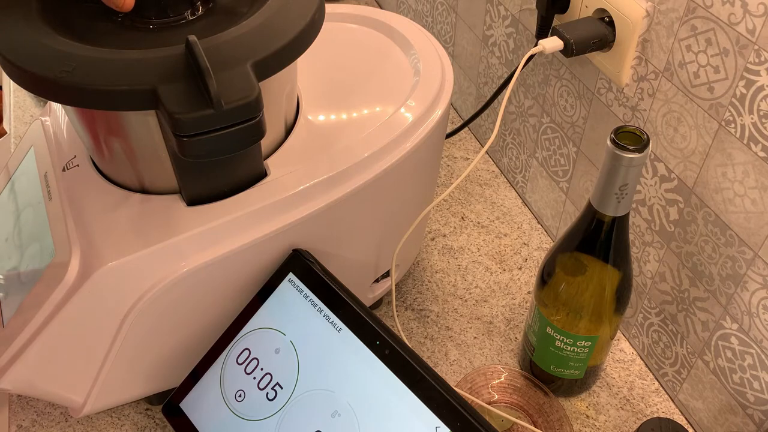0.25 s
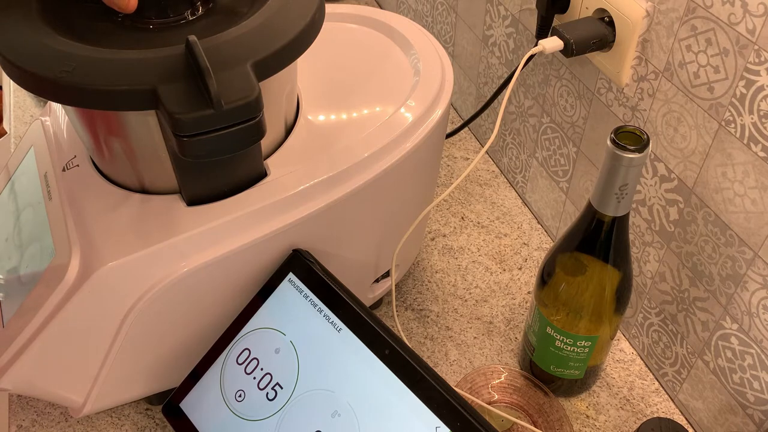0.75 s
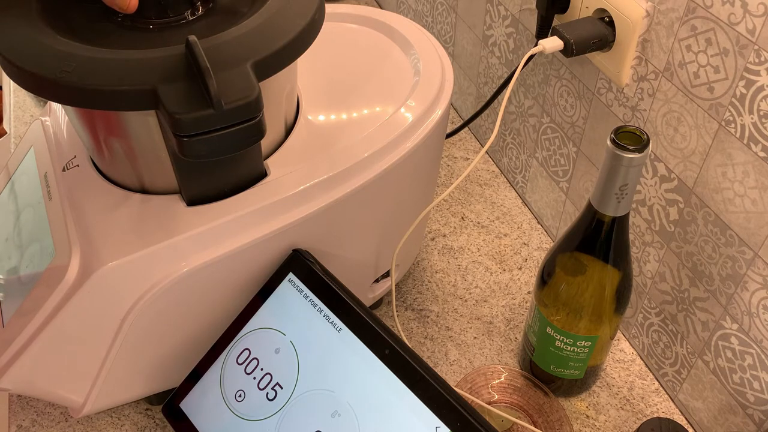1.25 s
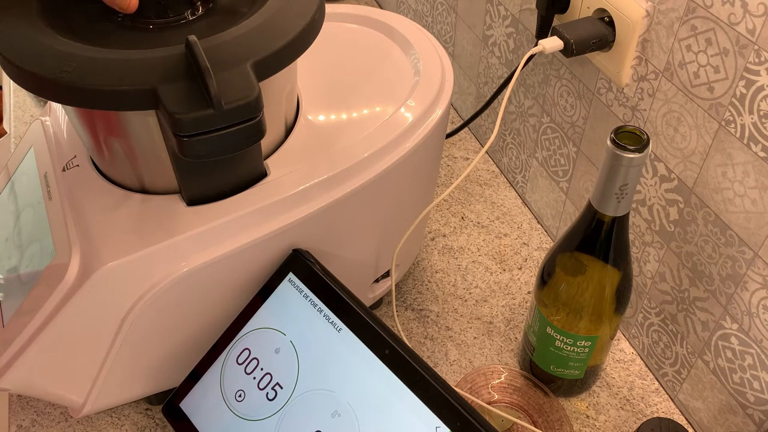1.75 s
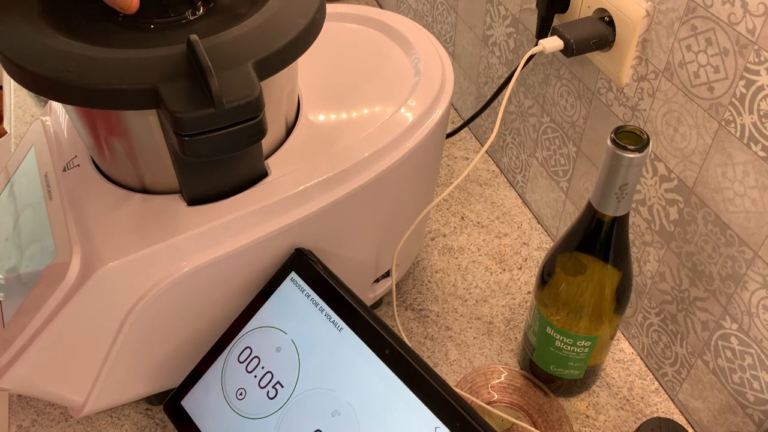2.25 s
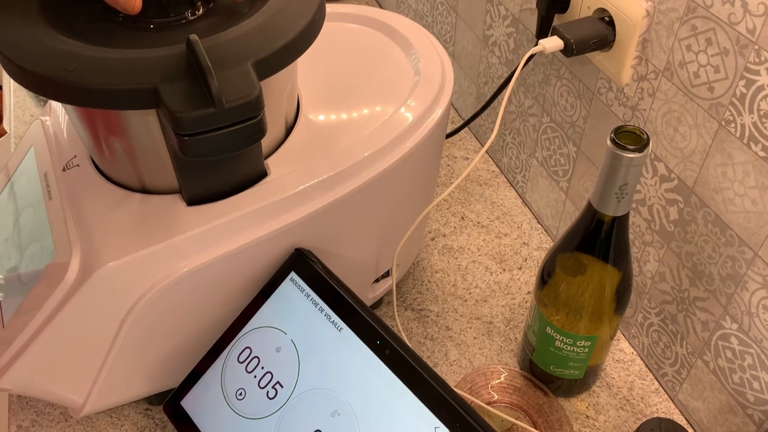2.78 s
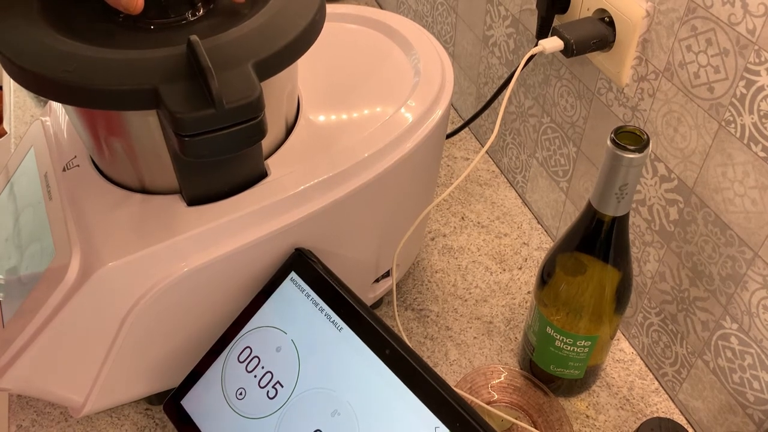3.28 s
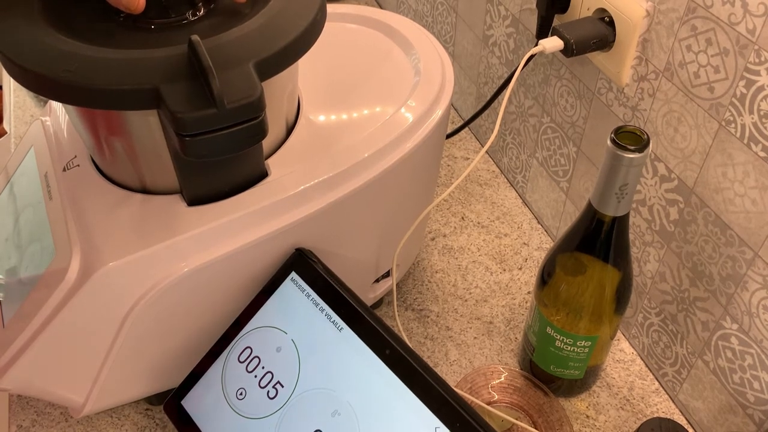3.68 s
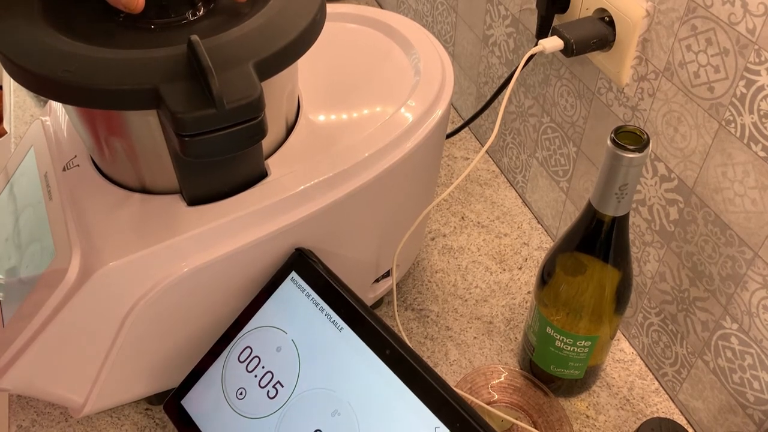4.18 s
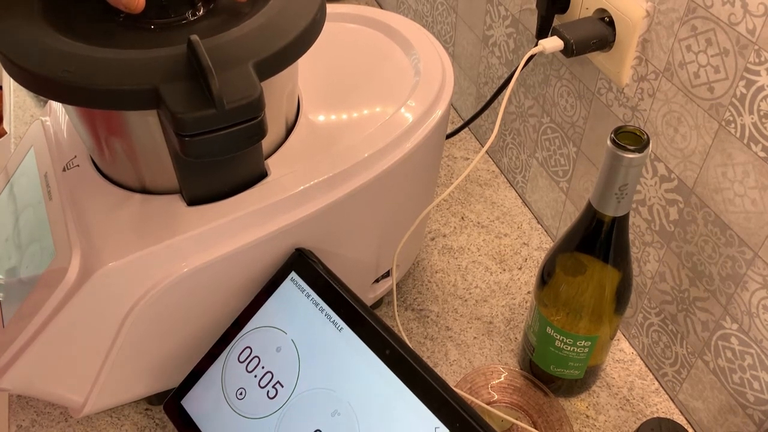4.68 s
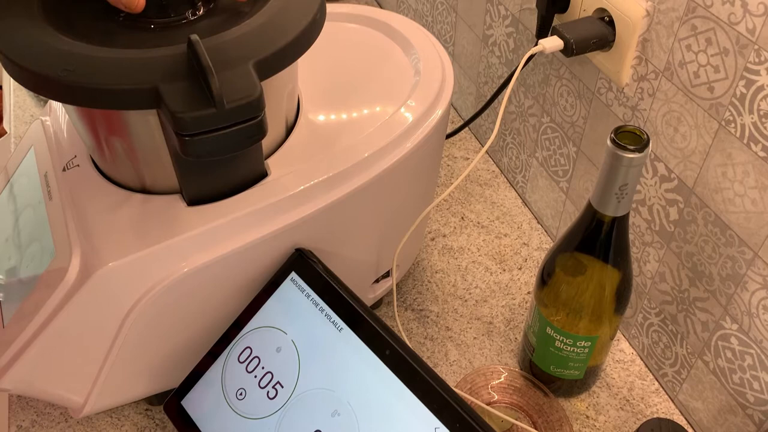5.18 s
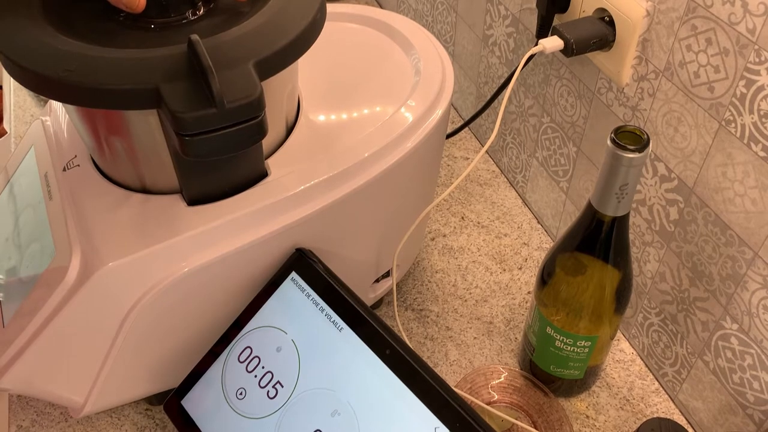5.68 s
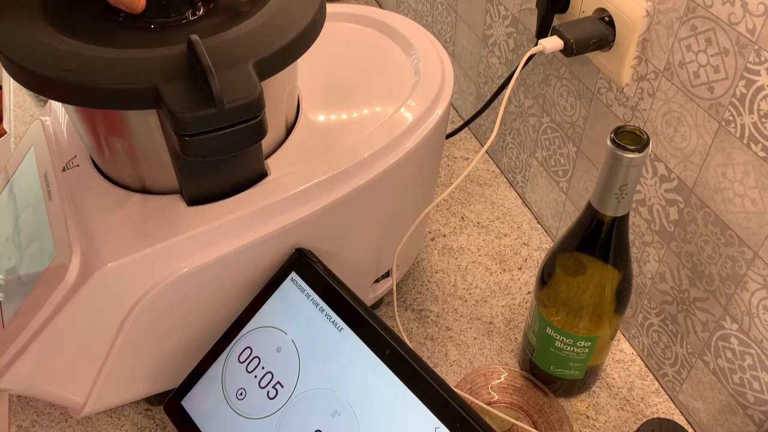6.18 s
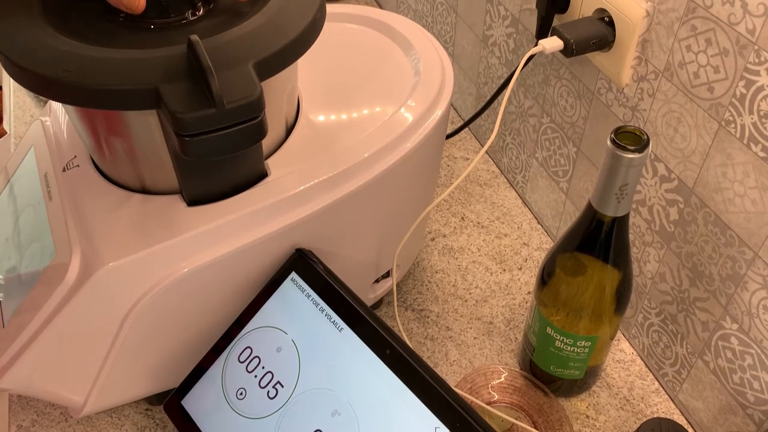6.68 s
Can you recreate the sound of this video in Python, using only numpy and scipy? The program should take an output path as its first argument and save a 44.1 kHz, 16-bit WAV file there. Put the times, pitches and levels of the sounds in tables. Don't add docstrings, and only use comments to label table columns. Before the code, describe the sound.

In a small tiled kitchen, soft bumps and far wooden knocks come first over faint room air, then a double switch click and a barely audible rising motor buzz. Just before two seconds a food processor leaps to full power: low hum, gear whine, brush hiss, wet crunching and sharp cracks of onion against steel. It is close and stereo, gradually thinning as the motor speeds up, still running at the end.

```python
import sys
import numpy as np
from scipy import signal
from scipy.fft import rfft, irfft, next_fast_len
from scipy.io import wavfile
from scipy.ndimage import uniform_filter1d

SR = 44100
rng = np.random.default_rng(int(sys.argv[2]) if len(sys.argv) > 2 else 0)


def store_pcm(level_fs):
    pcm = np.round(np.clip(level_fs, -1, 1) * 32767).astype(np.int16)
    wavfile.write(sys.argv[1], SR, np.atleast_2d(pcm).T)


def boost_factor(decibels):
    exponent = np.asarray(decibels, float) / 20
    return 10 ** exponent


N = 306054
SIZE = next_fast_len(N)
T = np.arange(N) / SR
LOG_HZ = np.log(np.maximum(np.fft.rfftfreq(SIZE, 1 / SR), 1))
START_S, BLADE_S, SPIN_S = 1.874, 1.93, 1.9
SILENT_DB = -110

# [t/s, shaft turns f/Hz, shaft hum level/dB, gear whine level/dB]
MOTOR = [(1.9, 80.1, -70, -80), (2.1, 78.6, -40.5, -40), (2.17, 77, -20, -27.5), (2.33, 76.7, -28, -32),
         (2.39, 76.2, -25, -43), (2.45, 75.06, -21, -24.5), (2.56, 79.3, -16, -33),
         (2.79, 79.64, -21.5, -30.5), (2.92, 81.4, -19, -34), (3.5, 84.17, -16, -31.5),
         (3.9, 86.3, -19.5, -35.5), (4.35, 87.1, -18, -31.5), (4.6, 88.4, -21, -31),
         (5.0, 88.3, -18, -29.5), (5.5, 90.4, -21, -28.5), (6.0, 90.9, -17.5, -28.5),
         (6.2, 91.7, -16.5, -25.5), (6.94, 91.35, -16.5, -25.5)]
# [start t/s, length t/s, crunch level/dB]
FLURRIES = [(1.96, 0.14, -15), (2.264, 0.11, -9.5), (2.53, 0.023, -11), (2.593, 0.15, -14),
            (2.885, 0.1, -11.5), (3.169, 0.16, -17.5), (3.388, 0.14, -19.5), (3.582, 0.079, -19),
            (3.84, 0.18, -18.5), (4.048, 0.22, -20), (4.287, 0.037, -15.5), (4.389, 0.032, -16.5),
            (4.637, 0.049, -17), (4.747, 0.29, -21), (5.141, 0.092, -18.5), (5.531, 0.16, -23),
            (5.825, 0.044, -20.5), (6.041, 0.026, -23), (6.24, 0.045, -18), (6.388, 0.058, -23),
            (6.503, 0.13, -42), (6.752, 0.14, -20)]
# [t/s, change of level/dB]
LULLS = [
    (2.21, -1),
    (2.46, -0.5),
    (2.83, -1.5),
    (3.069, 1),
    (3.78, -4.5),
    (4.06, -3.5),
    (4.14, -2),
    (5.28, -2.5),
    (5.4, -0.5),
]
# [t/s, rumble level/dB]
TUMBLES = [(1.99, -22), (2.069, -13), (2.14, -17), (2.3, -14), (2.37, -16), (2.43, -21), (2.57, -17),
           (2.66, -18.5), (3.26, -17.5), (3.45, -21), (3.62, -17), (3.97, -25), (4.091, -19), (4.27, -18),
           (4.37, -22), (4.44, -21), (4.67, -17), (4.81, -18.5), (5.06, -16.5), (5.2, -26), (5.53, -36),
           (5.86, -19.5), (6.06, -36), (6.2, -35), (6.4, -29), (6.6, -20.5), (6.8, -17)]
# [t/s, peak level/dB, ring centre f/Hz, brightness level/dB]
CRACKS = [(2.0474, -3.5, 2450, -14), (2.0772, -12.5, 4660, -26), (2.3082, -3.5, 2120, -18),
          (2.393, -10, 2200, -34), (2.5286, -14.5, 6700, -2), (2.605, -11, 2420, -13),
          (2.645, -7.5, 3773, -20), (2.675, -8, 5470, -8), (2.8692, -21.5, 4975, -4),
          (2.9038, -4.5, 3800, -17), (2.966, -2.5, 2270, -17), (3.1087, -11.5, 6700, -28),
          (3.3202, -9.5, 3740, -14), (3.6511, -4, 2700, -19.5), (3.714, -10.5, 2860, -22),
          (3.8597, -6, 2680, -13), (3.9483, -14.5, 6440, -13), (3.9658, -5, 3800, -21),
          (4.1809, -8, 3470, -29), (4.2422, -5, 3590, -27), (4.4716, -11.5, 7500, -10),
          (4.5424, -7, 4200, -33), (4.6677, -6.5, 2930, -33), (4.7792, -3.5, 2450, -22),
          (4.9898, -6.5, 2440, -26), (5.1787, -2.5, 2450, -18), (5.6185, -10, 4740, -39),
          (6.5397, -1, 2450, -38), (6.7515, -10.5, 3909, -17), (6.79, -10.5, 6277, -34.5)]
# [t/s, peak level/dB, ring centre f/Hz]
CHIPS = [(1.966, -24, 6830), (2.001, -23, 5040), (2.0607, -5, 2150), (2.1166, -5, 2180), (2.2623, -9, 2340),
         (2.2916, -22, 4300), (2.4274, -12, 2280), (2.4894, -14.5, 3930), (2.7531, -5, 2270),
         (3.188, -14.5, 2930), (3.2291, -10.5, 7380), (3.2856, -11, 6750), (3.5498, -6.5, 2520),
         (3.8197, -18, 2980), (4.2924, -14, 3700), (4.368, -13.5, 2890), (4.8643, -12.5, 3011),
         (4.9739, -8.5, 2603), (5.2024, -17, 3786), (5.3374, -17, 7100), (5.3652, -18, 6760),
         (5.4669, -19, 3750), (5.491, -16.5, 7030), (5.7149, -14, 2846), (5.7302, -10.5, 5380),
         (5.8066, -16, 7890), (6.1754, -5, 2430), (6.2375, -13.5, 4623), (6.5119, -12, 2452),
         (6.5635, -9, 5230)]
# [t/s, peak level/dB, ring centre f/Hz]
MORE_CHIPS = [(1.9774, -21, 4650), (2.3515, -13, 6560), (2.571, -18, 3620), (2.88, -10, 3820),
              (3.063, -14.5, 2780), (3.4077, -25, 2774), (3.4376, -26, 3080), (3.491, -16.5, 5380),
              (3.5798, -22, 2890), (3.8471, -8.5, 2440), (4.0718, -20.5, 5350), (4.1056, -19, 2870),
              (4.5604, -12, 4420), (4.9467, -21, 2630), (5.0729, -19, 2910), (5.0978, -29, 2650),
              (5.3098, -18, 2990), (5.4477, -22, 6610), (5.5443, -21, 4710), (5.9257, -16.5, 4570),
              (5.9773, -28, 2950), (6.0482, -12, 2820), (6.119, -14, 2878), (6.3515, -19, 2850),
              (6.3996, -8.5, 2450), (6.4565, -16, 3004), (6.6533, -19, 2450), (6.6991, -18.5, 3105),
              (6.8044, -15, 2910)]
# [f/Hz, density level/dB]
CRUNCH = [(800, -4), (1500, -2.5), (2200, 3), (3500, 1.5), (5500, -1), (8000, -0.5), (10000, -2),
          (13000, -30.5), (16000, -21)]
# [f/Hz, density level/dB]
BRUSH = [(5000, -1), (8000, -2.5), (10500, 6), (11700, 2), (12170, 9.5), (12700, 5.5), (13200, 1.5),
         (13620, 7), (13900, 2), (15000, 0), (15800, -4)]
# [f/Hz, width f/Hz, level/dB]
BOWL = [(2180, 18, -14), (2270, 43, 12), (2450, 103, 9), (2480, 37, 2), (2910, 210, 9.5), (3530, 560, 5),
        (3800, 840, 8), (4740, 210, 2), (4540, 420, 1), (5600, 2900, 8), (6700, 690, 3), (8170, 3900, 9)]
# [f/Hz, width f/Hz, level/dB]
GEARBOX = [(1258, 30, 8), (1314, 50, 10), (1417, 55, 7), (1524, 55, 6), (1590, 60, 4), (1672, 50, 9.5)]
# [f/Hz, width f/Hz, level/dB]
HOUSING = [(108.7, 14, 0), (207.7, 19.2, 0.5), (289.3, 15, -5), (332.5, 24, -1.5), (402, 18.5, -8),
           (438, 18, -6), (594.4, 27, -5.5), (687, 68, -18), (930, 37, -21.5)]
# [f/Hz, density level/dB]
RUMBLE = [(18, -62), (30, -114), (57, -19), (91, 0.5), (146, -21), (327, -21), (1030, -21.5), (1480, -19),
          (2200, -31.5), (2860, -33), (4840, -120)]
# [t/s, pulse rate f/Hz, level/dB]
CREEP = [
    (.7, 111, -70),
    (.9, 122.3, -58.5),
    (1.22, 150, -54.5),
    (1.38, 166.7, -52.5),
    (1.54, 184.8, -54.5),
    (1.7, 201, -52),
    (1.9, 210.3, -56),
    (1.96, 214, -90),
]
# [f/Hz, width f/Hz, level/dB]
CREEP_MODES = [(188, 45, 20), (327, 21, 25.5), (696, 120, 9.5), (1340, 250, -5), (1950, 68, 6.5),
               (2290, 170, 1)]
# [t/s, peak level/dB]
SWITCH = [
    (0.678, -33.5),
    (0.686, -31.5),
]
# [f/Hz, level/dB, t60/s]
SWITCH_MODES = [(195, -2, 0.31), (1420, -8, 0.3), (2066, -1, 0.3), (3170, -8, 1.5), (3192, -4, 0.27),
                (3768, -15, 0.41), (4237, -19, 0.49), (4592, -28, 1.0), (5949, -26, 5.0)]
# [f/Hz, level/dB]
SWITCH_SNAP = [(88, -30), (150, 2), (888, -11.5), (1420, -9), (2650, -22), (3100, -10), (4580, -22),
               (7620, -16.5), (9820, -24), (10600, -17), (16000, -22)]
# [f/Hz, width f/Hz, level/dB]
SWITCH_TAIL = [(1390, 220, -13), (2120, 260, -6), (3100, 190, -1), (3700, 500, -8)]
# [t/s, peak level/dB]
BUMPS = [
    (.085, -26),
    (0.257, -19),
    (.3, -40),
]
# [t/s, peak level/dB]
KNOCKS = [
    (0.393, -30),
    (0.413, -31),
]
# [f/Hz, level/dB, t60/s]
WOOD = [(314, -5.5, 0.73), (408, 0, 0.19), (446, -1, 0.36), (523, 10, 0.15), (586, -1, 0.11),
        (677, -6, 0.087)]
# [f/Hz, level/dB]
AIR = [(12, -61), (20, -35), (70, 1), (434, -13.5), (499, -14), (542, -19), (1000, -25), (1120, -24),
       (2080, -44), (13500, -55.5), (16000, -58)]
# [f/Hz, direct share, right port lag/rad, left minus right level/dB]
PORTS = [(20, .995, 0, .6), (150, .98, 0, .4), (340, .86, 0, -.8), (700, .74, .5, -3.4),
         (1500, .3, 1.5, -.2), (2400, .35, .8, -.4), (4000, .4, .3, 1.7), (5200, .3, 0, 3.5),
         (6700, .45, .2, .3), (8200, .75, 1.75, -.5), (9100, .88, 2.75, 0), (9650, .92, 3.14, 0),
         (10200, .85, 3.65, 0), (11200, .76, 4.6, 0), (13400, .88, 6.28, 0), (14800, .72, 7.6, 0),
         (16300, .7, 9.1, 0)]
SCATTER_S = [
    (.0013, .0023, .0041, .0071, .0131),
    (.0011, .0029, .0037, .0079, .0119),
]


def rms_one(x):
    return x / np.sqrt(np.mean(x ** 2) + 1e-20)


def noise():
    return rng.standard_normal(N)


def in_time(rows):
    s, *columns = np.transpose(rows)
    return [np.interp(T, s, c) for c in columns]


def coloured(x, spectrum):
    hz, db = np.transpose(spectrum)
    gain = boost_factor(np.interp(LOG_HZ, np.log(hz), db))
    return rms_one(irfft(rfft(x, SIZE) * gain, SIZE)[:N])


def drift(rate_hz):
    coarse = rng.standard_normal(SIZE)[:SIZE // 16 * 16].reshape(-1, 16).sum(axis=1)
    grid_hz = np.fft.rfftfreq(len(coarse), 16 / SR)
    slow = irfft(rfft(coarse) / (1 + (grid_hz / rate_hz) ** 2), len(coarse))
    return np.interp(np.arange(N) / 16 - .5, np.arange(len(slow)), rms_one(slow))


def resonate(x, hz, width_hz):
    r = np.exp(-np.pi * width_hz / SR)
    zeros = np.array([1, 0, -1]) * (1 - r * r) / 2
    poles = [1, -2 * r * np.cos(2 * np.pi * hz / SR), r * r]
    return signal.lfilter(zeros, poles, x + 1e-18)


def resonate_twice(x, hz, width_hz):
    return resonate(resonate(x, hz, width_hz), hz, width_hz)


def body(x, modes):
    return sum((-1) ** k * boost_factor(db) * resonate(x, hz, width_hz) for k, (hz, width_hz, db) in enumerate(modes))


def clicks_at(events_s, gains):
    clicks = np.full(N, 1e-18)
    clicks[np.round(np.asarray(events_s) * SR).astype(int)] = gains
    return clicks


def fading(events_s, gains, t60_s, rise_s=.001):
    r = np.exp(-1 / (rise_s * SR))
    poles = np.poly([r, r, boost_factor(-60 / (t60_s * SR))])
    return signal.lfilter([(1 - r) ** 2], poles, clicks_at(events_s, gains))


def struck(events, modes, t60_share):
    s, db = np.transpose(events)
    clicks = clicks_at(s, boost_factor(db))
    out = 0
    for hz, level_db, t60_s in modes:
        r = boost_factor(-60 / (min(t60_s, .3) * t60_share * SR))
        w = 2 * np.pi * hz / SR
        ring = signal.lfilter([0, np.sin(w)], [1, -2 * r * np.cos(w), r * r], clicks)
        out = out + boost_factor(level_db) * ring
    return out


def grains(per_s, spread_db):
    sizes = boost_factor(spread_db * np.minimum(rng.exponential(1, N), 4.2)) * rng.choice([-1, 1], N)
    return rms_one(sizes * (rng.random(N) < per_s / SR))


def ramp(start_s, rise_s, drop_db):
    return drop_db * np.clip(1 - (T - start_s) / rise_s, 0, 1)


def swells(centre_s, half_s, height, edge_s):
    coarse_s = np.arange(0, N, 64) / SR
    away = np.clip((np.abs(coarse_s[:, None] - centre_s) - half_s) / edge_s, 0, 9)
    return np.interp(T, coarse_s, (height * np.exp(-away ** 2)).sum(axis=1))


def add_power(base_db, power):
    return 10 * np.log10(boost_factor(base_db) ** 2 + power)


def load():
    since_4 = T - 4
    tumble_s, tumble_db = np.transpose(TUMBLES)
    tumbling = swells(tumble_s, 0, boost_factor(2 * tumble_db), edge_s=0.04)
    rumble_db = add_power(-22.5 + since_4, tumbling) + ramp(START_S, 0.086, -22.5)
    creep_db = np.where(T > SWITCH[0][0], -55.5 + 2.5 * np.minimum(T - START_S, 0), SILENT_DB)
    rumble_db = np.maximum(np.where(T > START_S, rumble_db, SILENT_DB), creep_db)

    lull_s, depth_db = np.transpose(LULLS)
    bite_db = swells(lull_s, 0, depth_db, edge_s=0.064) + ramp(START_S, 0.13, -52)
    bite_db = bite_db + np.where(T > START_S, 0, SILENT_DB)
    start_s, length_s, db = np.transpose(FLURRIES)
    middle_s, half_s, edge_s = start_s + length_s / 2, length_s / 2, .012
    crunching = swells(middle_s, half_s, boost_factor(2 * db), edge_s)
    hissing = swells(middle_s, half_s, boost_factor(2 * (-19 + 0.64 * db)), edge_s)
    crunch_db = add_power(-24 + 0.3 * since_4, crunching) + bite_db
    late_db = ramp(BLADE_S, 0.033, -22)
    brush_db = add_power(-29.5 + 0.88 * since_4, hissing) + bite_db + late_db
    return rumble_db, crunch_db, brush_db


def chopping(crunch_db, brush_db):
    bits = grains(2500 * boost_factor(3.1 * drift(25)), spread_db=3.0) + 0.61 * noise()
    crunch = coloured(bits, CRUNCH) + boost_factor(-12.5) * rms_one(body(bits, BOWL))
    hiss = coloured(noise() * boost_factor(3.1 * drift(35)), BRUSH)
    return boost_factor(crunch_db - 8.5 + 4.05 * drift(61)) * crunch + boost_factor(brush_db + 0.74) * hiss


def cracks():
    chip_trim_db, chip_bright_db = -3, -23
    small = [(s, db + chip_trim_db, hz, chip_bright_db) for s, db, hz in list(CHIPS) + list(MORE_CHIPS)]
    s, db, centre_hz, bright_db = np.transpose(list(CRACKS) + small)
    split_hz, rise_s = 2860, .0006
    lean_db = 5.5 * np.log2(centre_hz / split_hz)
    splinter = grains(9000, spread_db=3.0)
    broad = coloured(splinter, CRUNCH)
    dull = signal.sosfilt(signal.butter(3, split_hz, fs=SR, output="sos"), broad)
    sharp = signal.sosfilt(signal.butter(3, split_hz, "high", fs=SR, output="sos"), broad)

    out = dull * fading(s, boost_factor(db - 19.0 - lean_db), .024, rise_s)
    out += sharp * fading(s, boost_factor(db - 4 + lean_db), .007, 0.00035)
    out += sharp * fading(s, boost_factor(db - 30 + lean_db), .045, rise_s)
    out += broad * fading(s, boost_factor(db - 14.5), 0.16)
    out += coloured(splinter, BRUSH) * fading(s, boost_factor(db + bright_db + 10.5), 0.018, rise_s)
    for hz, width_hz, level_db in BOWL:
        near_db = -18 * np.abs(np.log2(hz / centre_hz)) + 3.5 * rng.standard_normal(len(s))
        burst = (splinter + 1.5) * fading(s, boost_factor(db + level_db + near_db + 4.5), 0.007, .0002)
        out += resonate(burst, hz, width_hz)
    return out


def gears():
    shaft_hz, _, db = in_time(MOTOR)
    turn = 2 * np.pi * np.cumsum(shaft_hz * (1 + .010 * drift(7) + .02 * drift(90))) / SR
    teeth = 17.1 * turn
    throb = 1 + .5 * np.sin(turn)
    tooth = np.sin(teeth) * throb * boost_factor(3 * drift(25)) + 2.2 * noise()
    octave = boost_factor(-4.0 + 4.2 * drift(25)) * np.sin(2 * teeth)
    return boost_factor(db) * (0.99 * body(tooth, GEARBOX) + 0.59 * np.sin(teeth) + octave) * (T > SPIN_S)


def shaft():
    hz, db, _ = in_time(MOTOR)
    turn = 2 * np.pi * np.cumsum(hz * (1 + 0.011 * drift(7.3))) / SR
    return np.sqrt(2) * boost_factor(db - 1.2 + 0.99 * drift(30)) * np.sin(turn) * (T > SPIN_S)


def housing(rumble_db):
    thuds = noise() * boost_factor(5.0 * drift(29)) + 1.62 * grains(150, spread_db=2.0)
    broad = coloured(noise(), RUMBLE)
    return boost_factor(rumble_db) * (boost_factor(-0.5) * rms_one(body(thuds, HOUSING)) + boost_factor(-7.0) * broad)


def halves():
    since_s = T - START_S
    boom = rms_one(resonate_twice(noise(), 189, 100))
    level_db = -16 + ramp(START_S, 0.095, -25) - 60 * np.maximum(since_s, 0) / 1.6
    return boom * (since_s > 0) * boost_factor(level_db)


def creep():
    hz, db = in_time(CREEP)
    pulse_count = np.floor(np.cumsum(hz * (1 + .002 * drift(4))) / SR)
    pulses = np.diff(pulse_count, prepend=0) * boost_factor(1.5 * drift(4))
    motor = rms_one(body(pulses + .002 * noise(), CREEP_MODES))
    stir = rms_one(resonate_twice(noise(), 130, 255))
    stir_gain = boost_factor(12 * (T - 1.56))
    return boost_factor(db) * (motor + stir_gain * stir)


def switch():
    s, db = np.transpose(SWITCH)
    snap_envelope = fading(s, boost_factor(db + 5.5), 0.033) + fading(s, boost_factor(db - 13.5), 0.24)
    snap = coloured(noise(), SWITCH_SNAP) * snap_envelope
    tail = body(noise(), SWITCH_TAIL) * fading(s, boost_factor(db - 9.0), 0.5)
    return snap + tail + boost_factor(-16) * struck(SWITCH, SWITCH_MODES, t60_share=0.88)


def bumps():
    s, db = np.transpose(BUMPS)
    return resonate_twice(noise() * fading(s, boost_factor(db), .15), 208, 130)


def knocks():
    s, db = np.transpose(KNOCKS)
    puff = noise() * fading(s, boost_factor(db), 0.12)
    wood = boost_factor(-8) * struck(KNOCKS, WOOD, t60_share=0.83)
    hollow = signal.butter(3, [300, 760], "band", fs=SR, output="sos")
    return signal.sosfilt(hollow, puff + wood)


def room_air():
    mid, side = [coloured(noise(), AIR) * boost_factor(0.66 * drift(14)) for _ in range(2)]
    return boost_factor(-53.5) * (mid + 0.48 * side * np.array([[1], [-1]]))


def ports(x, paths=1):
    size = next_fast_len(N + SR // 4)
    grid_hz = np.fft.rfftfreq(size, 1 / SR)
    hz, *columns = np.transpose(PORTS)
    share, lag, balance_db = [np.interp(grid_hz, hz, c) for c in columns]
    delays = np.exp(-2j * np.pi * grid_hz * paths * np.array(SCATTER_S)[:, :, None])
    gain = .62
    scatter = np.prod((delays - gain) / (1 - gain * delays), axis=1)
    side = np.array([[1], [-1]]) / 2
    heard = np.sqrt(share) * np.exp(1j * side * lag) + np.sqrt(1 - share) * scatter
    return irfft(rfft(x, size) * heard * boost_factor(side * balance_db), size)[:, :N]


def scene():
    rumble_db, crunch_db, brush_db = load()
    strikes = cracks() + gears()
    machine = chopping(crunch_db, brush_db) + shaft() + housing(rumble_db)
    small = halves() + creep() + switch() + bumps() + knocks()
    short_paths = .1
    return ports(machine + small) + ports(strikes, short_paths) + room_air()


def merge(x):
    hz, _, z = signal.stft(np.array([x[0] + x[1], x[0] - x[1]]) / 2, SR, nperseg=2048)
    power = np.abs(z[:, :1024].reshape(2, 64, 16, -1)) ** 2
    band_db = 10 * np.log10(power.sum(axis=2) + 1e-20)
    treble_db = 10 * np.log10(power[:, 24:].sum(axis=(0, 1, 2)) + 1e-20)
    calm = np.diff(treble_db, prepend=0) < 6
    excess_db = uniform_filter1d(band_db[::-1] - band_db, size=2, axis=1)
    excess_db = uniform_filter1d(excess_db, size=2, axis=2)
    weak = (excess_db > 5.8) & calm & (hz[:1024:16, None] > 6000)
    z[:, :1024] *= ~np.repeat(weak, 16, axis=1)
    z[:, hz > 15760] *= ~calm
    mid, side = signal.istft(z, SR, nperseg=2048)[1][:, :N]
    return np.array([mid + side, mid - side])


def band_limit(x):
    return signal.sosfilt(signal.butter(12, 16510, fs=SR, output="sos"), x)


def record(dry):
    rounded = 1.1 * np.tanh(dry / 1.1)
    cut = signal.sosfilt(signal.cheby2(14, 60, 16450, fs=SR, output="sos"), rounded)
    cut = signal.sosfilt(signal.butter(3, 42, "high", fs=SR, output="sos"), cut)
    return band_limit(merge(cut))


dry = scene()
out = record(dry)
store_pcm(out)
```